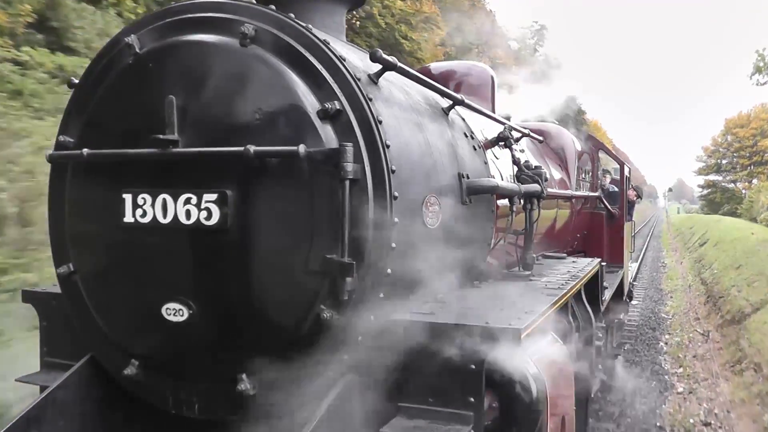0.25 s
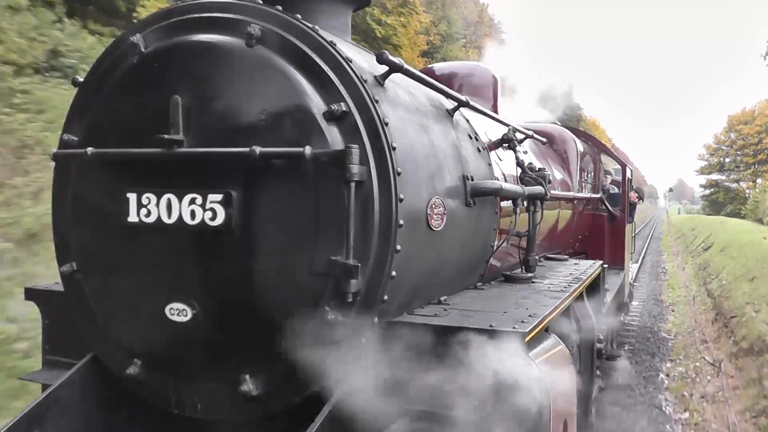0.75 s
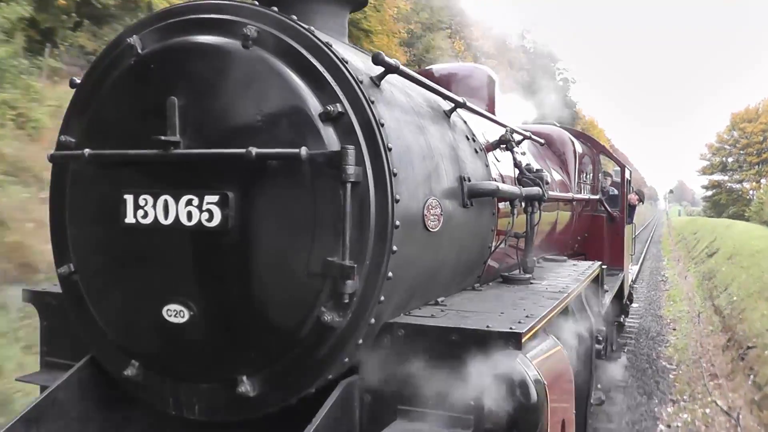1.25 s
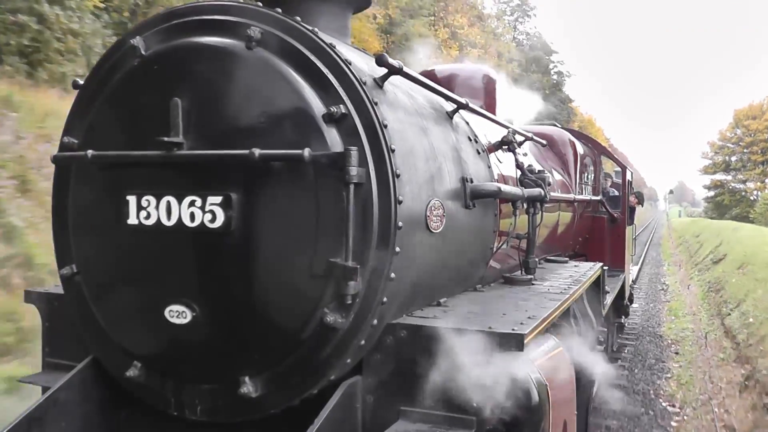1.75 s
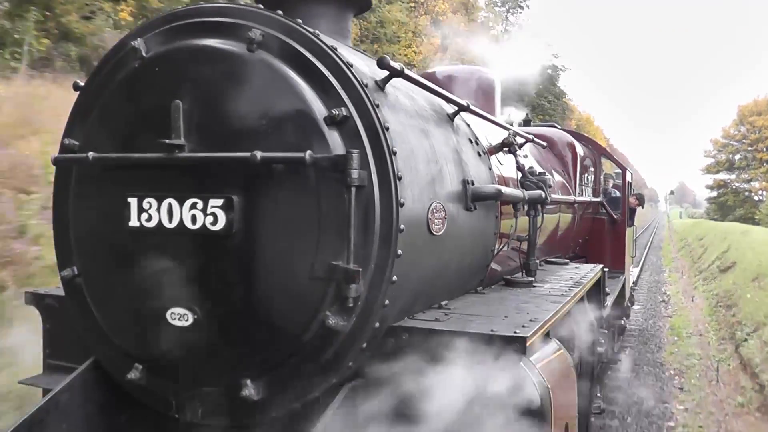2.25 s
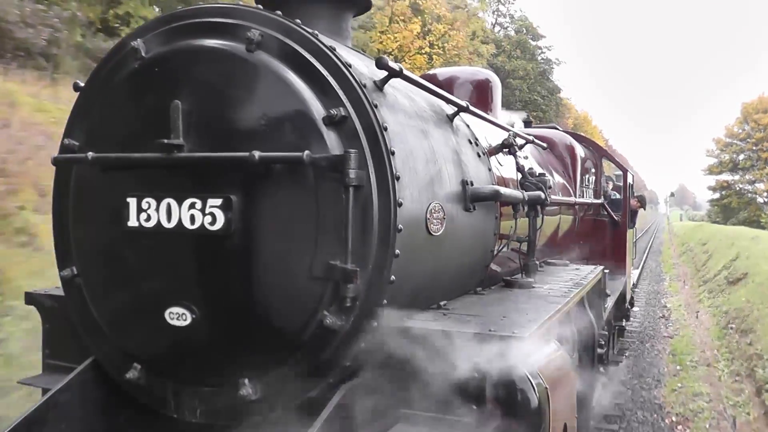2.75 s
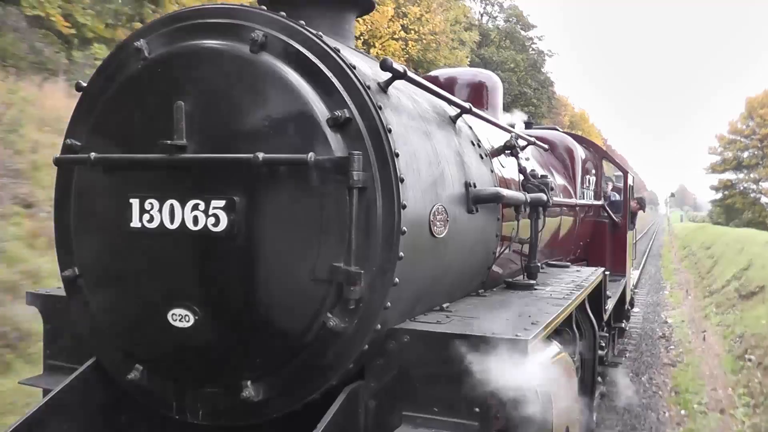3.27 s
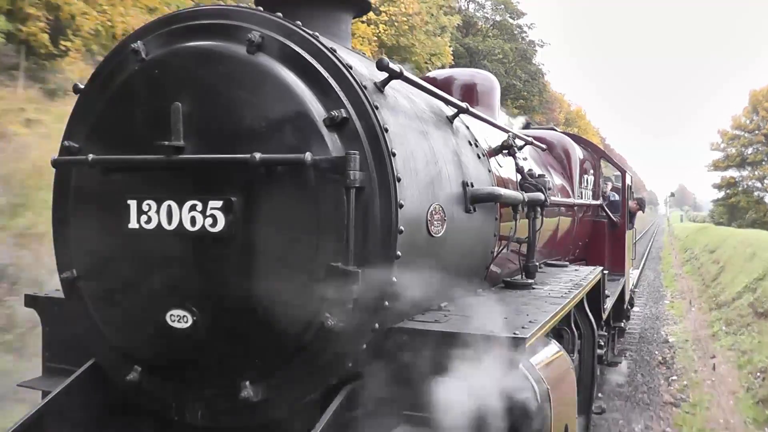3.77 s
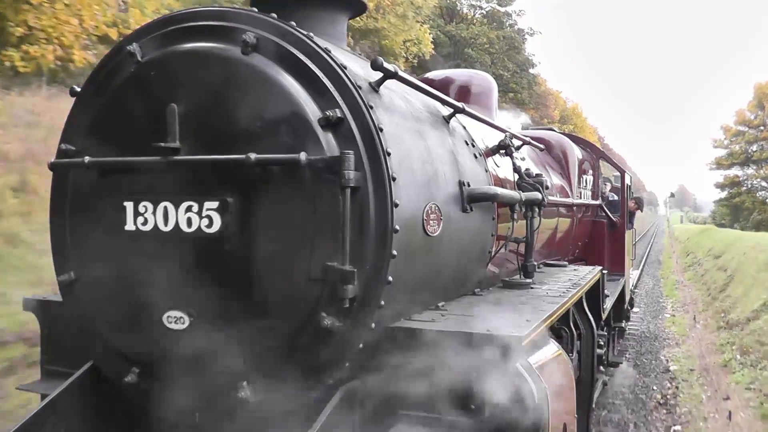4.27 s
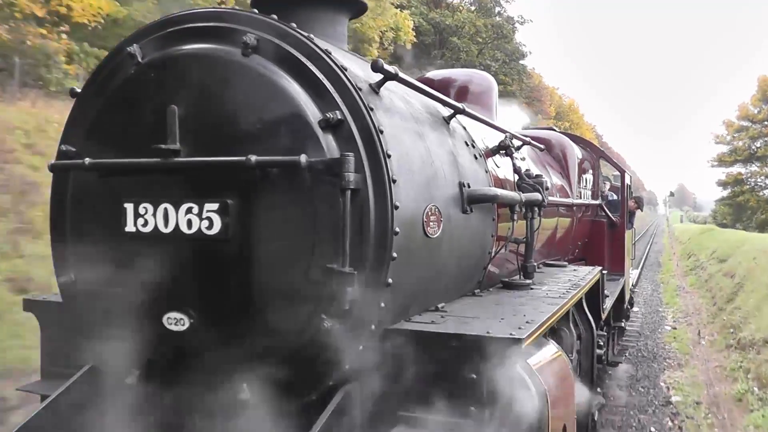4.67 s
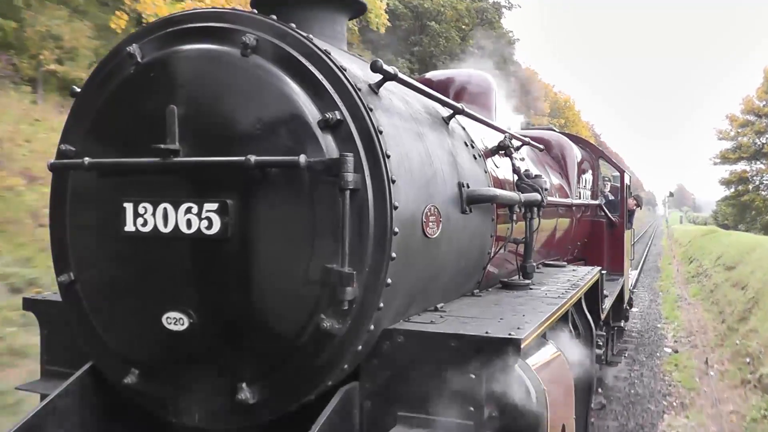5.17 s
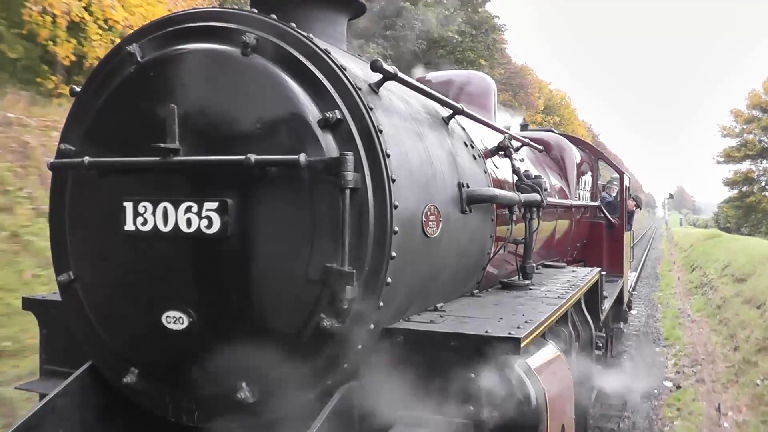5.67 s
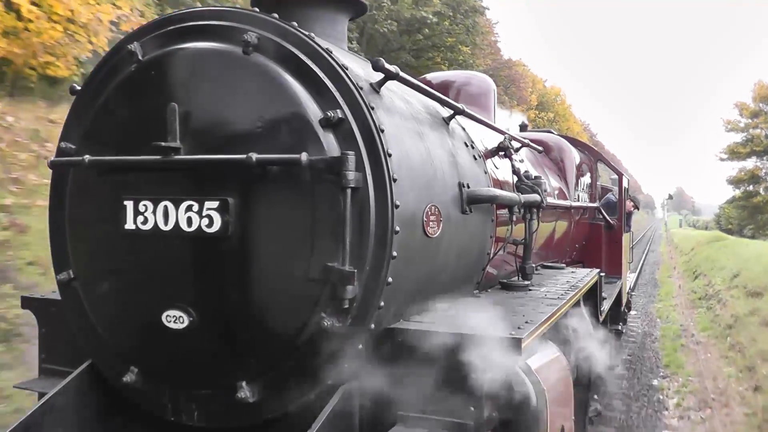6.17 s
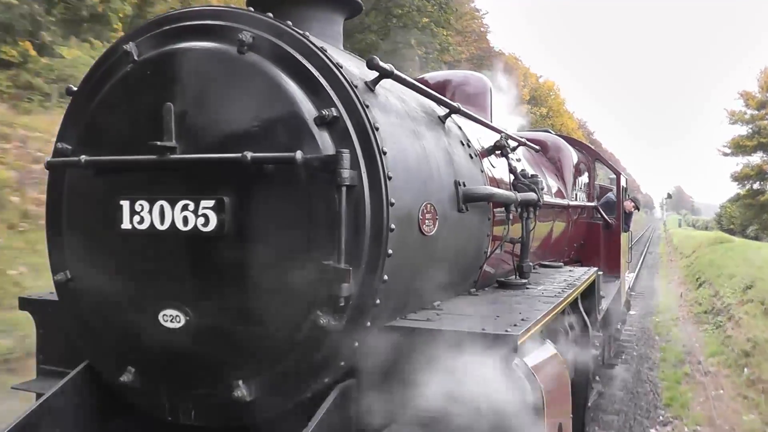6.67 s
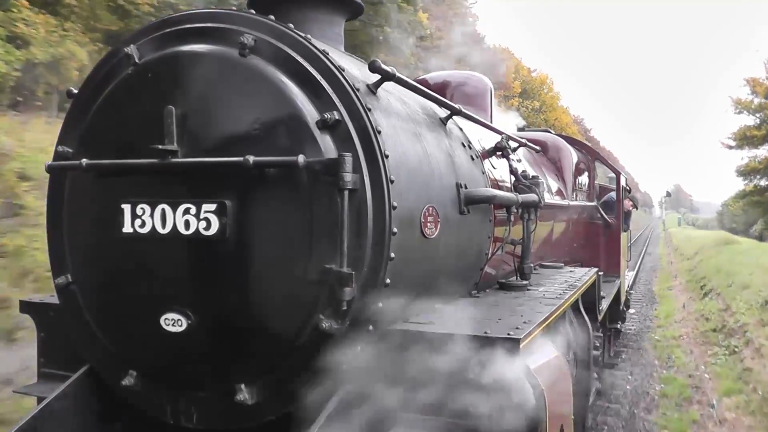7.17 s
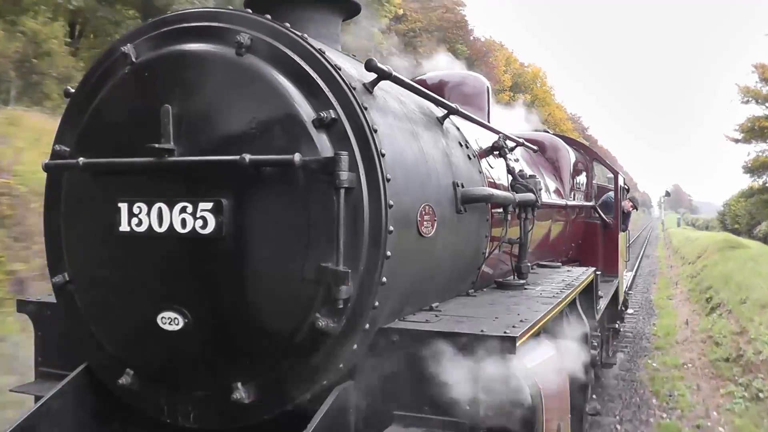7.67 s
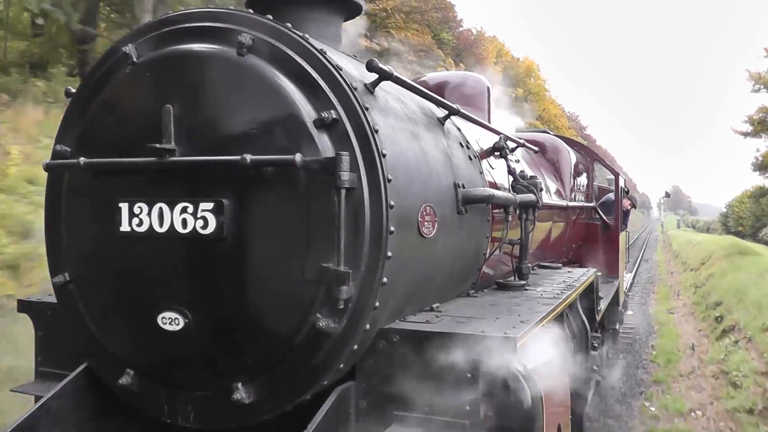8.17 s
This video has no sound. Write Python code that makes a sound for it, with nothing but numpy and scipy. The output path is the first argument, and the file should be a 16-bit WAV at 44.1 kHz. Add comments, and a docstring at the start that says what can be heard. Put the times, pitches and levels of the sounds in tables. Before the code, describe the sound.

A steam locomotive chuffs rapidly close up, about five booming, hissing puffs a second, over rumbling wheels and occasional grinding metallic knocks.

```python
"""At the front end of a running two-cylinder steam locomotive, at about five exhaust beats a second.
Each beat is a rush of filtered noise with a hiss on top, and it sets the chimney booming.
A leaking gland rises and falls with each turn of the wheels, over a faint steady sizzle and passing air.
Wheels rumble on the rails, and short grinding knocks ring the frame as the running gear clanks.
Short echoes color the sound, a limiter holds down the loudest beats and the highest crests are clipped."""
import sys
import numpy as np
from scipy import signal
from scipy.fft import rfft, irfft, next_fast_len
from scipy.io import wavfile

SR = 44100
rng = np.random.default_rng(int(sys.argv[2]) if len(sys.argv) > 2 else 0)


def int16_out(signal):
    """Quantize to a 16-bit WAV file."""
    q = np.round(np.clip(np.atleast_2d(signal).T, -1, 1) * 32767)
    wavfile.write(sys.argv[1], SR, q.astype(np.int16))


N = 371763
TIME = np.arange(N) / SR  # s
FFT_SIZE = next_fast_len(N, real=True)
FREQS = np.maximum(np.fft.rfftfreq(FFT_SIZE, 1 / SR), 1)  # Hz, kept above zero for the logarithm


def from_db(db):
    """Turn decibels into a gain."""
    return 10 ** (np.asarray(db) / 20)


def rms_one(x):
    """Scale a sound so that its rms (average strength) is 1."""
    return x / np.sqrt(np.mean(x ** 2) + 1e-20)


def at_hz(points):
    """Read a table at every frequency, with straight lines between points on a log-frequency axis."""
    hz, value = np.transpose(points)
    return np.interp(np.log(FREQS), np.log(hz), value)


def at_time(points, s):
    """Read a table at the given times, with straight lines between points."""
    return np.interp(s, *np.transpose(points))


def shaped_noise(gain, channels):
    """Unrelated noises, one per channel, with the given gain at each frequency."""
    spectrum = rfft(rng.standard_normal((channels, FFT_SIZE)))
    return irfft(spectrum * gain, FFT_SIZE)[:, :N]


def drift(rate_hz):
    """A random wander with spread 1, weaker and weaker above the given rate."""
    return rms_one(shaped_noise(1 / (1 + (FREQS / rate_hz) ** 2), channels=1)[0])


# how alike the left and right noises are: f/Hz, likeness (1 = the same)
STEREO_LIKENESS = [(30, .95), (130, .985), (290, .975), (640, .9), (1400, .88), (3100, .85), (6800, .88),
                   (15000, .5)]
# how much stronger the left is than the right: f/Hz, level/dB
STEREO_BALANCE = [(60, -4.5), (110, -2.5), (200, -1.0), (380, -0.5), (700, 3), (1290, 2.5), (2380, -1),
                  (4400, -4.5), (8120, 2), (15000, -4)]


def turbulence(gain):
    """Churning steam or rough contact as stereo noise of a given color, more alike in the bass; rms 1."""
    mid, side = rfft(rng.standard_normal((2, FFT_SIZE)))
    alike = np.clip(at_hz(STEREO_LIKENESS), 0, 1)
    sides = np.array([[1], [-1]])  # left, right
    pair = np.sqrt(1 + alike) * mid + sides * np.sqrt(1 - alike) * side
    balance = from_db(sides * at_hz(STEREO_BALANCE) / 2)
    return rms_one(irfft(pair * gain * balance, FFT_SIZE)[:, :N])


def resonance(hz, width_hz):
    """Gain of a resonance with steep skirts."""
    return 1 / (1 + ((FREQS - hz) / width_hz) ** 2)


# slow rise and fall in loudness of the exhaust roar, hiss and leaks: t/s, level/dB
STEAM_LOUDNESS = [(0, .8), (.7, 0.9), (1.12, -2.5), (1.7, -1.3), (2.0, -3), (2.39, -0.45), (4.54, 0.14),
                  (6.04, -0.8), (6.67, 0.9), (7.9, -0.2), (8.1, 1.5), (8.43, -1)]


def loudness_db(s):
    """Slow rise and fall in loudness of the exhaust roar, hiss and leaks, at the given times."""
    return at_time(STEAM_LOUDNESS, s)


# travel of the driving wheels, four exhaust beats to a turn: t/s, beats gone by
WHEEL_TRAVEL = [(.07, 0), (.48, 2), (3.027, 14), (3.621, 17), (4.184, 20), (5.253, 26), (6.037, 30),
                (6.459, 32), (8.305, 41)]
# the valves are set unevenly, so the four beats of a turn differ, one row each, before later offsets:
# blast level/dB, chimney boom level/dB, hiss level/dB, boom delay/s
BEATS_OF_TURN = [(-22.5, -7.5, -37.5, 0.0055), (-26.5, -11, -42.5, 0.0028), (-24.5, -6.5, -39, 0.005),
                 (-23, -7, -37.2, 0.0062)]
# swell of the chimney boom, apart from the other steam sounds: t/s, level/dB
BOOM_SWELL = [(0, -1), (1.0, 3.5), (1.7, -4.5), (2.6, 2.5), (3.1, -.5), (4.2, -3), (4.7, 0.5), (5.2, -1),
              (7.3, -1), (8.2, 0.5)]


def crank():
    """Beats into the current wheel turn; the wheels roll on at their mean pace before and after."""
    s, gone = np.transpose(WHEEL_TRAVEL)
    pace = gone[-1] / (s[-1] - s[0])  # beats per second
    outside_s = TIME - np.clip(TIME, s[0], s[-1])
    return (np.interp(TIME, s, gone) + pace * outside_s) % len(BEATS_OF_TURN)


def beats(hiss_follows=1.3):
    """One beat per quarter turn: times, then blast, boom and hiss levels and boom delays."""
    s, gone = np.transpose(WHEEL_TRAVEL)
    number = np.arange(round(gone[-1]) + 1)
    beat_s = np.interp(number, gone, s)
    blast_db, boom_db, hiss_db, delay_s = np.array(BEATS_OF_TURN)[number % len(BEATS_OF_TURN)].T
    swell_db = loudness_db(beat_s)
    boom_db = boom_db + at_time(BOOM_SWELL, beat_s)
    # the hiss swings more than the blast does
    return beat_s, blast_db + swell_db, boom_db, hiss_db + hiss_follows * swell_db, delay_s


def puffs(levels_db, lag, opening, hold, emptying):
    """Flow of all beats (times in s): the valve opens smoothly, then the cylinder empties exponentially."""
    flow = np.zeros(N)
    for peak_s, level_db in zip(beats()[0] + lag, levels_db):
        near = np.abs(TIME - peak_s) < .3
        age = TIME[near] - peak_s
        rise = np.exp(-.5 * np.abs(age / opening) ** 2.3)
        fall = np.exp((hold - np.hypot(age, hold)) / emptying)
        flow[near] += from_db(level_db) * np.where(age < 0, rise, fall)
    return flow


# color of the air on the microphone: f/Hz, relative level/dB (per Hz)
WIND_COLOR = [(20, -41.5), (50, -9.5), (90, -9), (220, 12), (450, -13), (1000, -27.5), (4000, -69.5)]


def slipstream(level_db=-39):
    """Passing air buffets each microphone port on its own, so left and right are unrelated."""
    wind = rms_one(shaped_noise(from_db(at_hz(WIND_COLOR)), channels=2))
    return from_db(level_db + 2.0 * drift(6)) * wind


# color of the steady steam sizzle: f/Hz, relative level/dB (per Hz)
SIZZLE_COLOR = [(1900, -18), (2250, -7.5), (2550, 8.5), (2800, -7.5), (3050, -13), (4200, -14.5),
                (5000, -10), (6500, -13.5), (8000, -27.5), (15000, -50.5)]


def sizzle(level_db=-54):
    """Steam seeps steadily from the fittings; level before the slow rise and fall is added."""
    return from_db(level_db + 2.0 * drift(5.5)) * turbulence(from_db(at_hz(SIZZLE_COLOR)))


# color of the rolling noise: f/Hz, relative level/dB (per Hz)
ROLLING_COLOR = [(25, -25.5), (50, -1), (90, 7), (160, 13.5), (260, 13.5), (420, 4), (650, 5), (880, -5),
                 (1400, -3), (1850, -5.5), (2200, -19), (3200, -25.5), (12000, -62.5)]
# rise and fall of the rolling noise, of which only the swing is used: t/s, level/dB
ROLLING_COURSE = [(0.0, -32), (0.47, -28), (0.75, -28.5), (0.94, -35.5), (1.57, -32), (1.71, -28.5),
                  (2.02, -31.5), (3.4, -29), (3.99, -30), (4.53, -28.5), (5.61, -31.5), (6.13, -30.5),
                  (6.9, -25.5), (7.32, -32), (7.49, -28), (7.93, -24.5), (8.15, -31.5), (8.43, -29)]


def wheels(mean_db=-28, swing_scale=1.25):
    """Rough treads on the rails make an uneven rumble."""
    course_db = at_time(ROLLING_COURSE, TIME)
    swing_db = swing_scale * (course_db - course_db.mean())
    unevenness_db = 2.8 * drift(10)
    return from_db(mean_db + swing_db + unevenness_db) * turbulence(from_db(at_hz(ROLLING_COLOR)))


def ring(force, hz, t60):
    """A struck mode: a unit click rings with height 1 and fades by 60 dB in t60 seconds."""
    r = from_db(-60 / (t60 * SR))
    w = 2 * np.pi * hz / SR
    return signal.lfilter([0, np.sin(w)], [1, -2 * r * np.cos(w), r * r], force + 1e-18)


# knocks of the running gear, as blow strengths: t/s, thud level/dB, clang level/dB, clink level/dB
GEAR_KNOCKS = [(0.787, -28.5, -40, -47), (1.638, -13.5, -19, -20), (2.067, -13.5, -28.5, -51),
               (2.95, -9.5, -28, -38), (3.154, -25, -29, -36), (3.392, -13, -16, -30),
               (3.984, -29, -23, -29), (4.63, -20.5, -16, -31), (5.405, -15.5, -34, -23),
               (6.436, -25, -22, -23), (7.003, -3, -3, -21), (7.533, -8, -5.5, -11)]
# what the frame rings with: f/Hz, relative level/dB, time to fade by 60 dB t60/s
FRAME_MODES = [(386, 0.5, 0.024), (490, 3, 0.053), (635, 0, .045), (780, -2, 0.017), (1080, -6, 0.0074),
               (1200, -1.5, 0.031), (1600, 1.5, 0.023), (1870, -0.5, 0.012), (2385, -11, 0.025),
               (2880, -10, 0.045), (3540, -21, .02)]


def running_gear(contact_s=0.008, rattles_per_s=22, rattle_db=-31):
    """Loud knocks and a light random rattle, each a brief grinding contact, ring the frame."""
    blows = np.zeros((3, N))
    for s, *levels_db in GEAR_KNOCKS:
        blows[:, round(s * SR)] = from_db(levels_db)
    # rattle_db is the strongest rattle; most are weaker
    rattle = (rng.random(N) < rattles_per_s / SR) * from_db(rattle_db) * rng.random(N)
    # each contact fades exponentially and carries unit energy for a unit blow
    keep = np.exp(-1 / (contact_s * SR))
    contacts = signal.lfilter([np.sqrt(1 - keep ** 2)], [1, -keep], blows + rattle + 1e-18)
    thud, clang, clink = contacts
    out = np.zeros((2, N))
    for hz, mode_db, t60 in FRAME_MODES:
        force = thud if hz < 950 else clang if hz < 2150 else clink
        # grinding noise: a shared part plus a smaller part of each side's own
        grind = rng.standard_normal(N) + 0.36 * rng.standard_normal((2, N))
        out += from_db(mode_db - 8.0) * ring(force * grind, hz, t60)
    # heavy parts meet softly, so little treble gets out
    return signal.sosfilt(signal.butter(2, 5000, fs=SR, output="sos"), out)


# color of the gland leak: f/Hz, relative level/dB (per Hz)
LEAK_COLOR = [(1500, -13), (2700, 2.5), (4200, 3.5), (5200, 2.5), (6600, -2.5), (8000, -11), (9400, -10),
              (10200, -18.5), (11200, -8), (12500, -24), (15500, -33.5)]
# gland leak over one wheel turn: beats into the turn, relative level/dB
LEAK_OVER_TURN = [(0, -9.5), (0.602, -18), (1.3, -18.5), (1.8, -11), (2.3, -10.5), (2.5, -0.5), (3, 0),
                  (3.2, -10), (3.6, -5.5), (4, -12.5)]


def gland_leak():
    """Steam escapes past a piston rod while that end of the cylinder is under pressure."""
    cycle_db = at_time(LEAK_OVER_TURN, crank())
    return from_db(cycle_db - 49.0 + drift(15)) * turbulence(from_db(at_hz(LEAK_COLOR)))


def chimney(hz=235.5, width_hz=16.5, evenness=0.4, scatter_db=1.0, scatter_s=.003):
    """The air column swings on each beat at a nearly even strength and rings on after it."""
    _, _, boom_db, _, delay_s = beats()
    # chance spread from beat to beat
    stronger, later = rng.standard_normal((len(delay_s), 2)).T
    boom_db = boom_db + scatter_db * stronger
    delay_s = delay_s + scatter_s * later
    column = turbulence(resonance(hz, width_hz))
    # dividing by part of its own swing evens out the tone
    swing = np.abs(signal.hilbert(column.mean(axis=0)))
    column = rms_one(column / (swing + 0.43) ** evenness)
    driven = puffs(boom_db - .5, lag=delay_s - .003, opening=0.014, hold=0.065, emptying=0.014)
    after_ring = puffs(boom_db - 16.0, lag=.076, opening=0.0081, hold=0.012, emptying=0.018)
    return column * (driven + after_ring)


# color of the exhaust roar: f/Hz, relative level/dB (per Hz)
BLAST_COLOR = [(25, -33), (50, -2), (90, 10.5), (150, 20), (300, 21), (420, 17.5), (600, 10.5), (760, 5.5),
               (830, 0), (1300, 3.5), (1850, 2.5), (2200, -11), (3200, -28), (6000, -52)]
# color of the exhaust hiss: f/Hz, relative level/dB (per Hz)
HISS_COLOR = [(1200, -23.5), (2100, -3.5), (2550, 4.5), (3300, 0.5), (4400, -5), (5300, -3.5), (6500, -7.5),
              (8000, -21), (10000, -29), (15500, -56)]


def exhaust():
    """The jet from the blast pipe: a ragged roar, a hiss on top and a faint edge tone."""
    _, blast_db, _, hiss_db, _ = beats()
    ragged = from_db(1.1 * drift(90))
    roar_flow = puffs(blast_db + 11, lag=-0.001, opening=.021, hold=0.028, emptying=0.025)
    roar = roar_flow * turbulence(from_db(at_hz(BLAST_COLOR)))
    hiss_flow = puffs(hiss_db - 0.5, lag=-0.0011, opening=0.026, hold=0.02, emptying=0.025)
    hiss = hiss_flow * turbulence(from_db(at_hz(HISS_COLOR)))
    edge_flow = puffs(blast_db - 13.5, lag=-0.015, opening=0.016, hold=0.0067, emptying=0.0069)
    edge_tone = edge_flow * turbulence(resonance(760, width_hz=16))
    return ragged * (roar + hiss + edge_tone)


# reflections off the boiler and running plate: delay t/s, level/dB
STEEL_ECHOES = [(.0053, -24.5), (0.0127, -20.5), (0.022, -18.5)]


def reflected(sound):
    """Nearby curved steel adds short, dull echoes that ripple the spectrum."""
    out = sound.copy()
    dull = signal.sosfilt(signal.butter(1, 3000, fs=SR, output="sos"), sound)
    for delay_s, level_db in STEEL_ECHOES:
        lag = round(delay_s * SR)
        out[:, lag:] += from_db(level_db) * dull[:, :N - lag]
    return out


def scene(leak_follows=.9):
    """Everything rides on the engine, at a fixed distance."""
    # the leaks follow most of the slow rise and fall in loudness
    leaks = from_db(leak_follows * loudness_db(TIME)) * (sizzle() + gland_leak())
    echoing = reflected(wheels() + running_gear() + exhaust())
    return slipstream() + leaks + echoing + chimney()


def record(dry, ceiling_db=-1.0, release_db_per_s=120, attack_s=0.003):
    """A limiter ducks under loud beats, remaining crests are clipped, and deep bass and top are cut."""
    over_db = np.maximum(20 * np.log10(np.abs(dry).max(axis=0) + 1e-9) - ceiling_db, 0)
    # hold each overshoot and let it recover at a steady rate, then smooth the ducking
    recovery_db = release_db_per_s * TIME
    held_db = np.maximum.accumulate(over_db + recovery_db) - recovery_db
    keep = np.exp(-1 / (attack_s * SR))
    duck_db = signal.lfilter([1 - keep], [1, -keep], held_db)
    clipped = np.clip(dry * from_db(-duck_db), -.78, .78)
    thinned = signal.sosfilt(signal.butter(2, 32, "high", fs=SR, output="sos"), clipped)
    top_cut = signal.ellip(10, .05, 60, 15730, fs=SR, output="sos")  # steep cut above 15730 Hz
    return signal.sosfiltfilt(top_cut, thinned)


dry = scene()
out = record(dry)
int16_out(out)
```